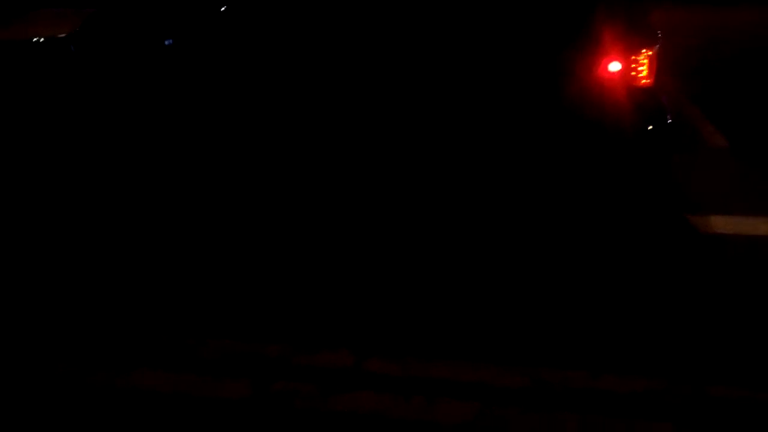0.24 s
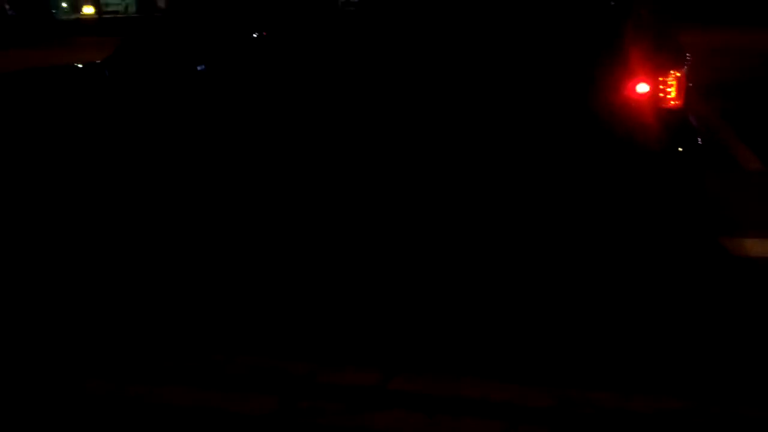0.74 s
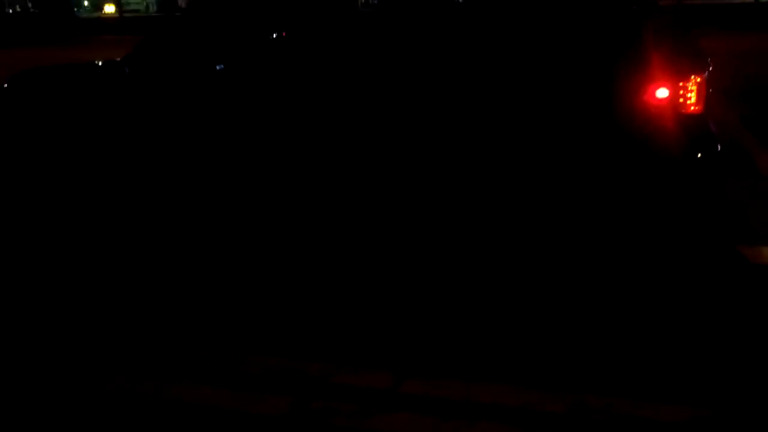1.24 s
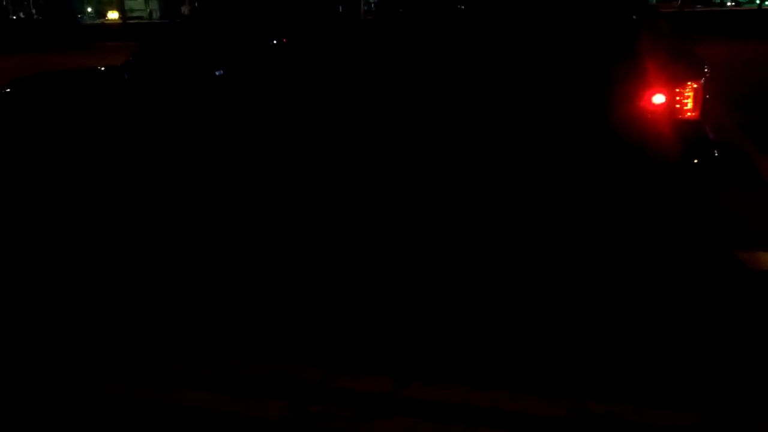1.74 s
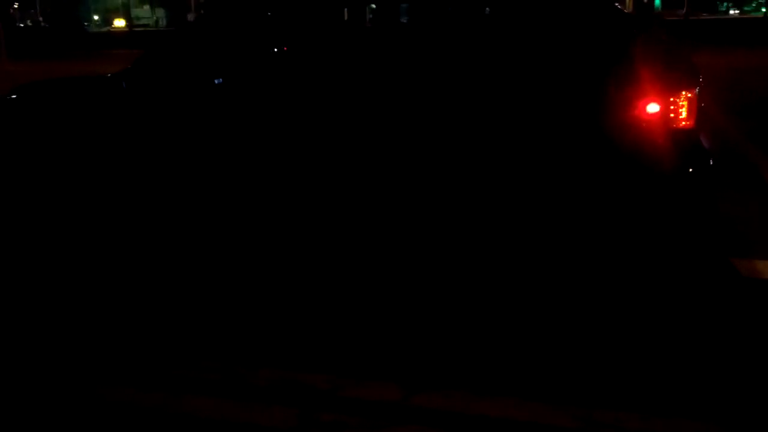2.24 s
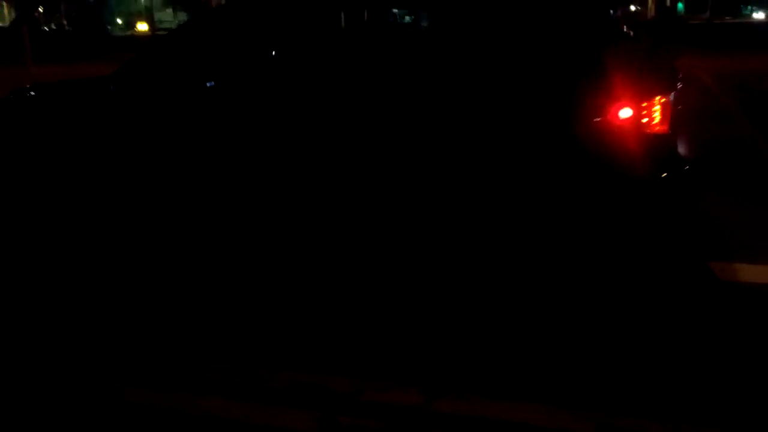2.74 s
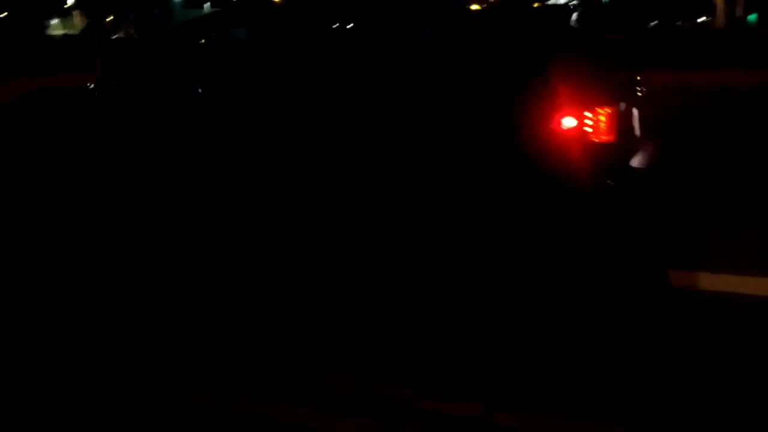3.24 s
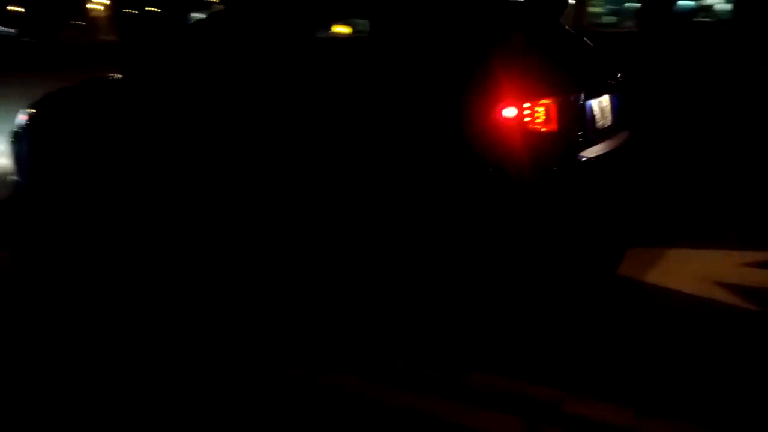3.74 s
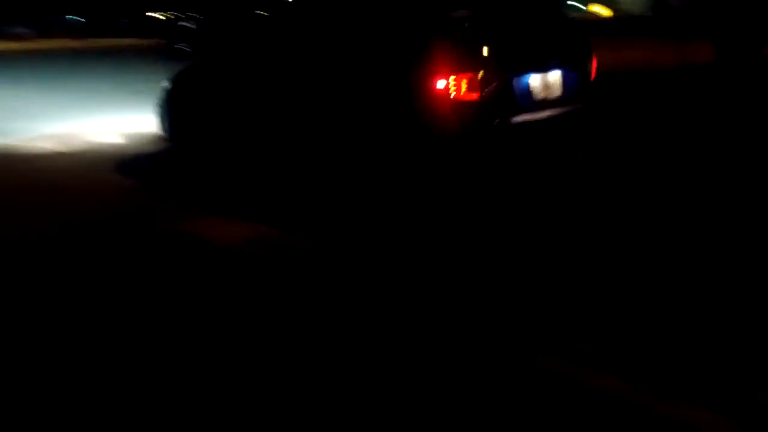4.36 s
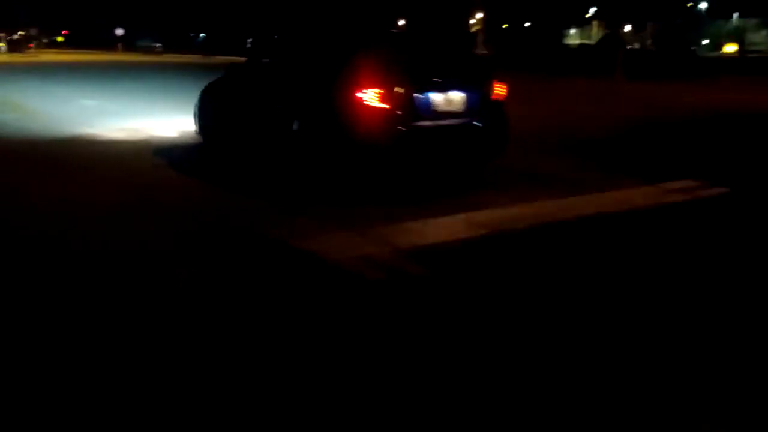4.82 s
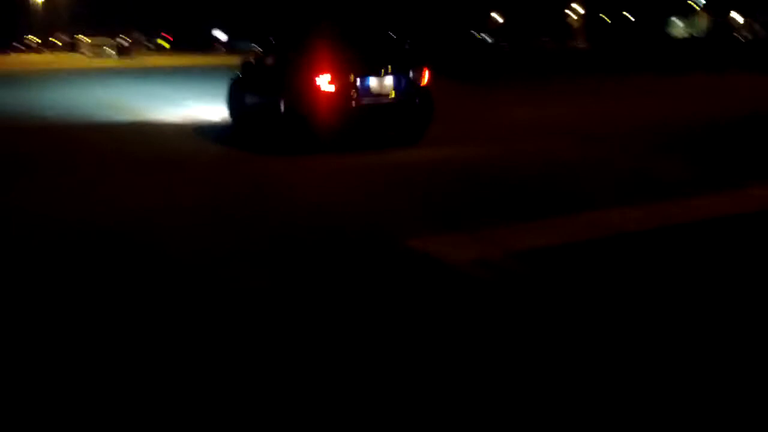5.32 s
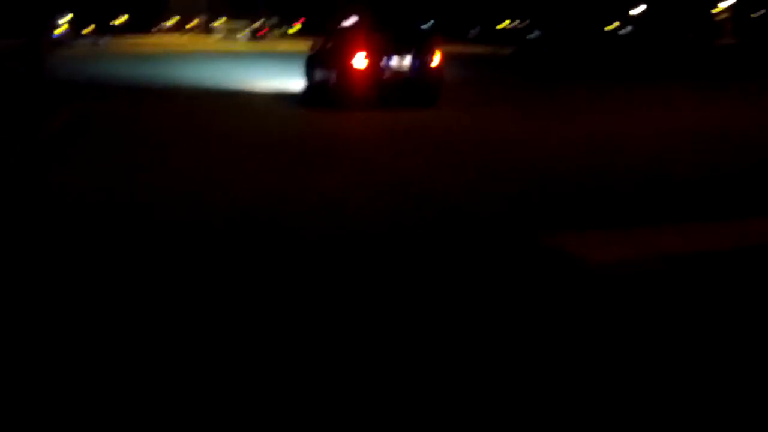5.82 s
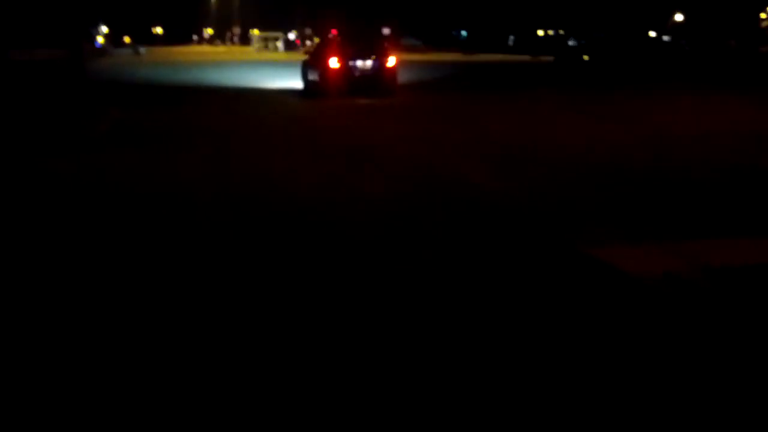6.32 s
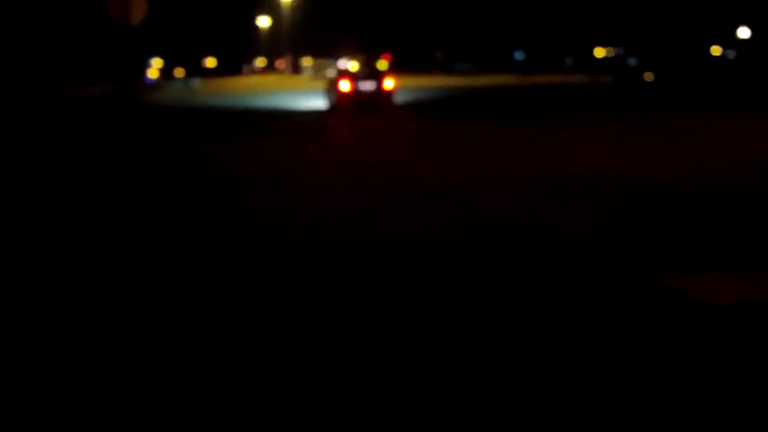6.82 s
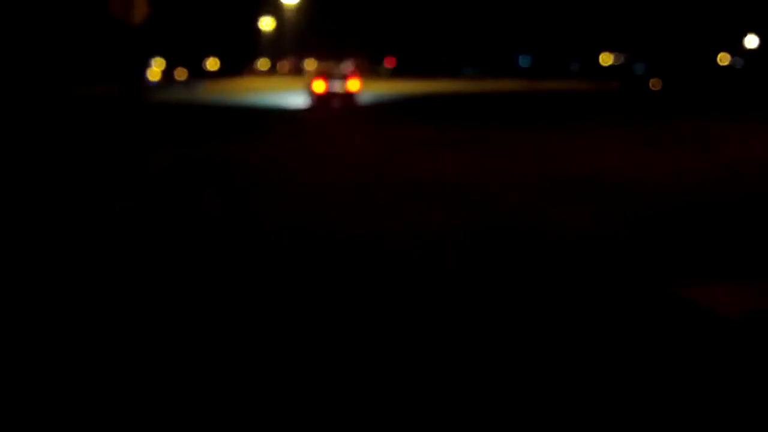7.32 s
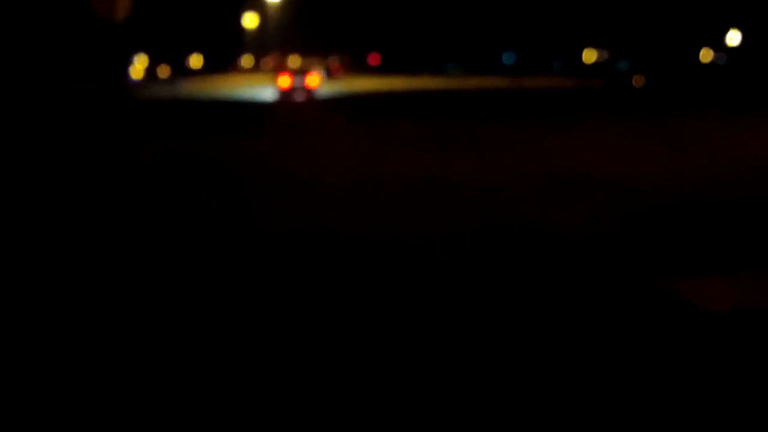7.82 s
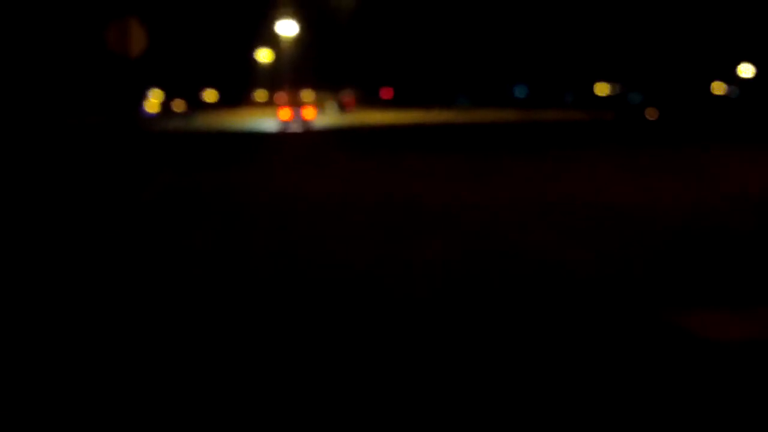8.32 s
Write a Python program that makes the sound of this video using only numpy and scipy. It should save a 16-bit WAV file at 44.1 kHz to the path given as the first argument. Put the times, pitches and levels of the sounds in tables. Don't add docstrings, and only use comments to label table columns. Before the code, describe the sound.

Silence until about 0.7 s, when a close car's open exhaust enters abruptly: a deep, uneven four-cylinder throb around 50 firings per second, with gas hiss, faint whine and soft rubbing scuffs. From 1.7 s a first throttle blip swells, peaks near 2.1 s and falls back by 2.9 s. A second, harsher, crackling blip peaks around 3.4 s as the car creeps, with thin high brake squeaks at 3-3.9 s. Revs sag at 4.3 s, then it pulls off; wind buffets the microphone around 4.8 s, grit ticks, and a dull knock marks a small jump at 5 s. Revs climb continuously, the tone tearing into a loud, bright rasp with tyre roar from 6 to 7.1 s, about four times idle pitch. At 7.2-7.3 s the throttle shuts: the rasp collapses to a muffled, rough overrun hum, falling in pitch and fading with tyre noise until 8.6 s.

```python
import sys
import numpy as np
from scipy import signal
from scipy.io import wavfile
from scipy.ndimage import uniform_filter1d

SR = 44100
rng = np.random.default_rng(int(sys.argv[2]) if len(sys.argv) > 2 else 0)


def attenuation_scalar(level_db):
    decades = np.asarray(level_db, float) / 20
    return 10 ** decades


def master_out(mix):
    frames = np.transpose(np.atleast_2d(mix))
    ceiling = np.clip(frames, -1, 1)
    pcm = np.round(ceiling * 32767).astype(np.int16)
    wavfile.write(sys.argv[1], SR, pcm)


N = 378378
T = np.arange(N) / SR
CYLINDERS = 4
SKIP_S = 4.99
ROLL_S = (2.94, 3.35)
TURN_S = (4.03, 5.34)
SHUT_S = (7.2, 7.35)

# (time [s], blow strength [dB], gas flow [dB])
EFFORT = [(.73, -17.5, -42.5), (1.5, -17.5, -41.5), (1.75, -9, -40), (2.15, -8.5, -36), (2.8, -11, -40.5),
          (3.2, -6.5, -38.5), (3.6, -7, -38.5), (4.25, -9.5, -40.5), (5.1, -7, -36.5), (5.5, -10.5, -38),
          (5.95, -7.5, -30.5), (6.33, -9, -19), (6.85, -10.5, -19), (7.18, -11.5, -27.5),
          (7.3, -22.5, -43.5), (7.42, -23.5, -44.5), (7.8, -20, -49.5), (8.58, -25, -57.5)]


def evened(x):
    return x / np.sqrt(np.mean(x ** 2) + 1e-20)


def mixed(a, b, share):
    return (1 - share) * a + share * b


def column(table, index):
    rows = np.asarray(table, float)
    return np.interp(T, rows[:, 0], rows[:, index])


def ramp(span):
    return np.interp(T, span, [0, 1])


def colour(x, hz, db, size=16384):
    f = abs(np.fft.fftfreq(size, 1 / SR))
    level_db = np.interp(np.log(f + 1), np.log(np.add(hz, 1)), db)
    log_gain = np.log(attenuation_scalar(np.maximum(level_db, -100)))
    response = np.exp(np.conj(signal.hilbert(log_gain)))
    taps = np.fft.ifft(response).real[:size // 2]
    return signal.oaconvolve(x, taps)[:N]


def noise(spectrum):
    return evened(colour(rng.standard_normal(N), *np.transpose(spectrum)))


def drift(size):
    return evened(uniform_filter1d(rng.standard_normal(N), size=size))


def speed():
    # (time [s], engine cycles, four firings each [Hz])
    cycle = [(0.72, 12.506), (1.542, 13.386), (2.13, 18.964), (2.468, 17.993), (2.949, 13.491),
             (3.409, 17.644), (3.606, 17.015), (3.81, 14.757), (4.294, 11.669), (4.434, 15.188),
             (4.543, 14.783), (5.417, 24.068), (5.877, 29.713), (7.077, 48.063), (7.508, 46.445),
             (7.51, 47.777), (8.082, 38.8), (8.58, 32.196)]
    flywheel_s = .2
    return uniform_filter1d(column(cycle, index=1), size=round(flywheel_s * SR), mode="nearest")


def octaves():
    idle_hz = 13
    return np.log2(speed() / idle_hz)


def crank():
    start_turn, skip_turn = .447, .174
    return np.cumsum(speed()) / SR + start_turn + skip_turn * (T > SKIP_S)


def per_firing(turns, spread_db):
    luck = rng.standard_normal(1400)
    return attenuation_scalar(spread_db * np.interp(turns * CYLINDERS, np.arange(len(luck)), luck))


def rumble():
    # (time [s], length [s], rise [dB])
    gust_events = [
        (.73, .05, 14),
        (3.62, .15, 14),
        (4.3, .12, 4),
        (4.78, 0.39, 19),
        (5.15, 0.22, 12),
        (6.15, .3, 9),
        (8.3, .3, 9),
    ]
    gusts = sum(db * np.exp(-((T - s) / length) ** 2) for s, length, db in gust_events)
    lumps_db = 2 * drift(5000)
    fade_db = -0.8 * T
    return attenuation_scalar(-49 + fade_db + lumps_db + gusts) * noise([(8, -12), (15, 20), (36, -10), (60, -39), (200, -74)])


def thud():
    hz, length_s, level_db = 36, .018, -20
    since = T - SKIP_S
    return attenuation_scalar(level_db) * np.exp(-(since / length_s) ** 2) * np.cos(2 * np.pi * hz * since)


def roar_db():
    driven = -51.5 + 14 * octaves() + 7.5 * ramp(ROLL_S)
    driven += 0.44 * (column(EFFORT, index=2) + 40)
    recede_s, recede_db_per_s = 6.24, -12
    driven += recede_db_per_s * np.maximum(T - recede_s, 0)
    coast_db = -38
    return mixed(driven, coast_db, ramp((7.17, 7.27)))


def tyre_roar():
    # (frequency [Hz], level [dB per Hz])
    road = [(280, -35), (480, -9.5), (678, -14), (795, -9), (1090, -2.5), (1350, -6.5), (1530, -18.5),
            (1710, -13), (2500, -32), (3250, -43), (5500, -120)]
    return attenuation_scalar(roar_db() + np.interp(T, SHUT_S, [-4.0, 1.5])) * noise(road)


def grit():
    # (time [s], peak [dB])
    ticks = [
        (0.8344, -36),
        (4.7302, -27),
        (4.8434, -23),
        (4.953, -27),
        (4.982, -21),
        (5.033, -30),
        (8.4622, -33),
    ]
    # (frequency [Hz], level [dB])
    tick_colour = [(500, -9), (2500, -7), (4300, 3), (6000, -7), (12000, -2), (16000, -20)]
    hits = np.zeros(N)
    for s, db in ticks:
        hits[round(s * SR)] = attenuation_scalar(db)
    tick = rng.standard_normal(300) * np.exp(-np.arange(300) / 55.0)
    return colour(signal.oaconvolve(hits, tick)[:N], *np.transpose(tick_colour))


def scuff():
    # (time [s], peak [dB])
    rub_events = [
        (.734, -46),
        (.762, -43),
        (.854, -41),
    ]
    # (frequency [Hz], level [dB per Hz])
    scuff_colour = [(900, -15), (1400, 1), (1800, -12), (2300, -1.5), (2800, -14), (4000, -30)]
    rise_s, decay_s = (.003, 0.0044, 0.053), (.02, 0.017, .14)
    rubs = sum(attenuation_scalar(db) * np.exp(np.minimum((T - s) / rise, (s - T) / decay))
               for (s, db), rise, decay in zip(rub_events, rise_s, decay_s))
    return rubs * noise(scuff_colour)


def whine_and_squeak():
    # (frequency [Hz], level [dB])
    whine = [(473.7, -49), (554.5, -53), (619.1, -52)]
    # (start [s], length [s], level [dB])
    squeaks = [
        (2.955, 0.045, -54),
        (3.0, .34, -57),
        (3.35, .05, -53),
        (3.74, .12, -49),
        (3.88, .17, -70),
    ]
    flutter = attenuation_scalar(2.6 * drift(900))
    out = 0
    for hz, db in whine:
        out += attenuation_scalar(db) * np.sqrt(2) * np.sin(2 * np.pi * hz * T) * (1 - ramp((1.6, 2.0))) * flutter ** .5
    squeak_hz = 4195 + 17.7 * drift(2500)
    tone = np.sqrt(2) * np.sin(2 * np.pi * np.cumsum(squeak_hz) / SR)
    on = sum(attenuation_scalar(db) * ((T > s) & (T < s + length)) for s, length, db in squeaks)
    return out + uniform_filter1d(on, size=900) * flutter * tone


def gas(turns):
    # (frequency [Hz], level [dB per Hz])
    bay_hiss = [(410, -10), (700, 0.5), (1010, -3.5), (1300, -11.5), (1500, -7.5), (2190, -8.5),
                (2430, -4.5), (2920, -10.5), (3690, -8), (4050, -10), (4730, -11.5), (6570, -14),
                (10500, -7.5), (14600, -14.5), (16000, -16)]
    load_rasp = [(420, -30), (720, -4.5), (1190, -3.5), (1450, -8.5), (1760, -2), (2090, -8.5),
                 (2310, -5.5), (3120, -11), (3690, -9), (4150, -11.5), (10300, -14), (15200, -24.5),
                 (16000, -36)]
    far_hiss = [(880, -32), (1500, -7), (1780, -4), (2100, -4), (3730, -10.5), (5830, -15.5),
                (11400, -21.5), (16000, -40)]
    tear = ramp((4.55, 5.99))
    shut = ramp(SHUT_S)
    place = (turns * CYLINDERS - .22) % 1
    strong = attenuation_scalar(-2.5 * (turns % 1 < .75))
    puff = strong * np.exp(-place / 0.48) * per_firing(turns, spread_db=4.5)
    bay = attenuation_scalar(2.5) * noise(bay_hiss) * evened(2.0 + puff)
    rasp = attenuation_scalar(6.0) * noise(load_rasp) * evened(0.73 + puff)
    far = attenuation_scalar(5.5) * noise(far_hiss)
    return attenuation_scalar(column(EFFORT, index=2)) * mixed(bay, mixed(rasp, far, shut), tear)


def crack_gain(firing):
    # (start [s], end [s], leading cylinder [dB], its follower [dB], the other two [dB])
    spells = [
        (1.798, 2.4, -37.5, -52, -52),
        (3.17, 3.806, -28.5, -30, -37.5),
        (3.847, 4.47, -32, -41, -47),
        (4.5, 4.847, -26, -30, -38),
        (4.852, 5.801, -30, -27.5, -33),
        (5.808, 7.19, -22.5, -39, -52),
    ]
    leaders = [2, 1, 3, 0, 1, 3]
    quiet_db, edge_s = -52, 0.085
    gain = attenuation_scalar(quiet_db) * np.ones(N)
    for (start, end, lead_db, next_db, rest_db), leader in zip(spells, leaders):
        on = np.clip(np.minimum(T - start, end - T) / edge_s + .5, 0, 1)
        by_rank = attenuation_scalar([lead_db, next_db, rest_db, rest_db])
        gain += on * by_rank[(firing - leader) % CYLINDERS]
    return gain


def cracks(turns):
    # (frequency [Hz], level [dB])
    crack_colour = [(200, -38.5), (400, 2.5), (600, 6.5), (800, -2), (1150, -7), (1500, -15.5),
                    (2200, -27.5), (9000, -46)]
    tear_s, tear_share = .003, .25
    firing = np.floor(turns * CYLINDERS - .1).astype(int)
    front = np.diff(firing, prepend=firing[0]) > 0
    even_power = np.sqrt(SR / CYLINDERS / speed())
    train = front * even_power * crack_gain(firing) * per_firing(turns, spread_db=1.3)
    fade = np.exp(-T[:1000] / tear_s)
    burst = signal.oaconvolve(train, fade / np.linalg.norm(fade))[:N] * rng.standard_normal(N)
    click = 1. * (np.arange(4096) == 0)
    snap = colour(click, *np.transpose(crack_colour))[:4096]
    return -signal.oaconvolve(mixed(train, 1.83 * burst, tear_share), snap / np.linalg.norm(snap))[:N]


def boom_db():
    side = 5.5 - 22.5 * np.minimum(octaves(), .6)
    behind = 2.5
    pulling = mixed(side, behind, ramp((4.45, 4.75))) - 5 * ramp((6.6, 6.8))
    overrun = 9 - 15 * ramp((7.8, 7.9))
    return mixed(pulling, overrun, ramp((7.3, 7.4)))


def bite_db():
    side = 6 - 10 * octaves() + 5 * ramp(ROLL_S)
    behind, shut = -3.3, -5.5
    return mixed(mixed(side, behind, ramp((3.98, 4.99))), shut, ramp((7.3, 7.4)))


def timing(k, hz, headers, lead):
    blows = sum(attenuation_scalar(db) * np.exp(-2j * np.pi * (k * j / len(headers) + hz * ms / 1000))
                for j, (db, ms) in enumerate(headers))
    steepness, corner_hz, offset_rad = lead
    return np.angle(blows) + steepness * np.arctan(corner_hz / hz) + offset_rad


def exhaust(turns):
    # (multiple of the cycle [1], free revving [dB], under load [dB], throttle shut [dB])
    orders = np.asarray([(1.0, -16, -20, -18), (2.0, -21, -22.5, -11.5), (3.0, -31, -17, -3.5),
                         (4.0, 11.5, -3.5, -0.6), (5.0, -1.5, -1.5, -1), (6.0, -39, -14.5, -8),
                         (7.0, -7, -5.5, -4), (8.0, -5.5, 2, -7.5), (9.0, -0.5, 0, -5.5),
                         (10.0, -21, -13.5, -5.5), (11.0, 0.5, -4.5, -14), (12.0, 2.2, -2.5, -13),
                         (13.0, -6, 2.5, -18), (14.0, -11, -11, -21), (15.0, -4, -7.5, -6),
                         (16.0, -0.6, -11, -22), (17.0, -2, 0.5, -11), (18.0, -16, -11, -7),
                         (19.0, -4, -12, -8), (20.0, -2.5, -10, -8), (21.0, -4, -2.5, -15),
                         (22.0, -24, -18, -4), (23.0, -1, -22, -4), (24.0, -19, -9, -5)])
    # (frequency [Hz], from the side [dB], from behind [dB])
    pipe_response = [(12.0, -28, -18), (34.96, -25, -13), (56, -18.5, -6.5), (82.7, -9, -5),
                     (108.3, -6.5, -3), (136.5, 2.5, 1), (165.3, -7, -5), (205.7, -22, -7),
                     (243.3, -21, 0.7), (280, -20, -4.5), (349, -26, -11), (467, -32.5, -19),
                     (670, -41.5, -24.5), (1220, -6, -21)]
    # (blow [dB], delay [ms])
    headers_side = [(0, 0), (-.82, -1), (1.39, -.94), (2.64, -.35)]
    headers_behind = [(0, 0), (-.21, -.27), (-.56, .88), (1.18, .6)]
    # (steepness [1], corner [Hz], offset [rad])
    lead_side = (5.21, 34, -1.12)
    lead_behind = (1.49, 63, .74)
    step = 8
    away, shut = ramp(TURN_S)[::step], ramp(SHUT_S)[::step]
    cycle_hz, low_db, high_db = speed()[::step], boom_db()[::step], bite_db()[::step]
    after = round(SKIP_S * SR / step)
    repeats = [orders[-8:] + [8 * j, -4 * j, -3 * j, -4 * j] for j in (1, 2)]
    pulses = 0
    for k, free_db, load_db, shut_db in np.vstack([orders] + repeats):
        k = round(k)
        hz = k * cycle_hz
        size = (1 - shut) * attenuation_scalar(mixed(free_db, load_db, away)) + shut * attenuation_scalar(shut_db) * (-1j) ** k
        boom = low_db * np.clip((115 - hz) / 30, 0, 1)
        bite = high_db * np.clip((hz - 180) / 40, 0, 1)
        size *= attenuation_scalar(boom + bite)
        swell_s, near_db, far_db = .12, 1.5, 4.5
        swell = np.interp(T[::step] / swell_s, np.arange(80), rng.standard_normal(80))
        size *= attenuation_scalar(mixed(near_db, far_db, shut) * swell * np.clip(k / 8 - .5 + shut, 0, 2 - shut))
        phase = np.append(timing(k, hz[:after], headers_side, lead_side),
                          timing(k, hz[after:], headers_behind, lead_behind))
        pulses = pulses + (size * np.exp(1j * (2 * np.pi * k * turns[::step] + phase))).real
    pulses = signal.resample_poly(pulses, step, 1)[:N]
    pulses *= per_firing(turns, spread_db=.6) ** (1 + 3 * ramp(SHUT_S))
    hz, side_db, behind_db = np.transpose(pipe_response)
    hz = np.append(hz, 3000)
    side = colour(pulses, hz, np.append(side_db, -62))
    behind = colour(pulses, hz, np.append(behind_db, -65))
    pipe = mixed(side, behind, ramp(TURN_S))
    slow = uniform_filter1d(uniform_filter1d(pipe ** 2, size=9000), size=9000)
    return attenuation_scalar(column(EFFORT, index=1)) * pipe / np.sqrt(slow)


def scene():
    start_s = .7245
    turns = crank()
    street = rumble() + thud() + tyre_roar() + grit()
    small = scuff() + whine_and_squeak()
    car = gas(turns) + cracks(turns) + exhaust(turns)
    return ((street + small + car) * (T > start_s))[None]


def roll_off(x):
    return signal.sosfilt(signal.butter(12, 16550, fs=SR, output="sos"), x)


def record(dry):
    top, knee = .72, 7.0
    flat = dry / (1 + abs(dry / top) ** knee) ** (1 / knee)
    edge = signal.firwin(601, 15720, window=("kaiser", 9), fs=SR)
    mix = signal.oaconvolve(flat, edge[None], "same")
    return roll_off(mix)


dry = scene()
out = record(dry)
master_out(out)
```